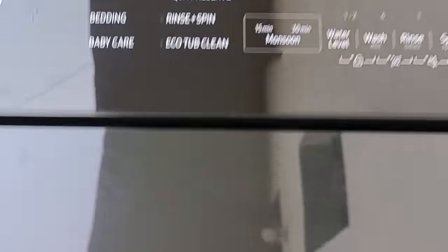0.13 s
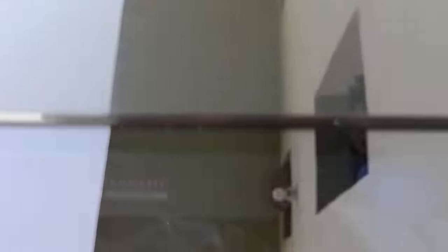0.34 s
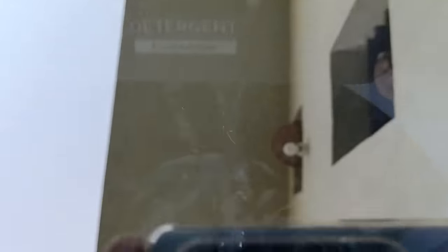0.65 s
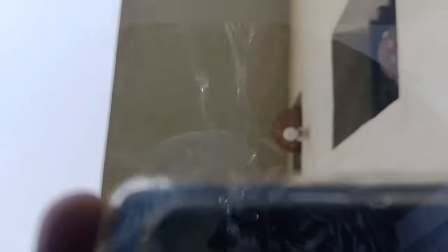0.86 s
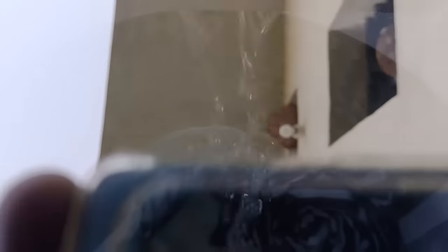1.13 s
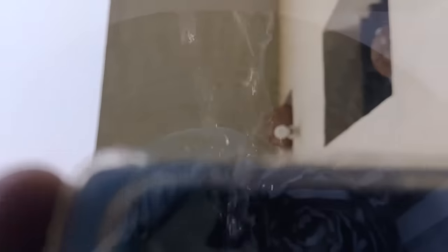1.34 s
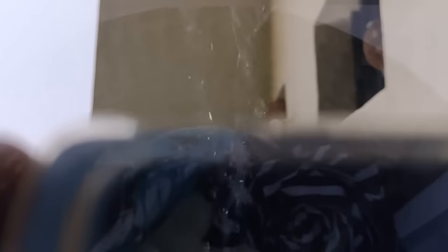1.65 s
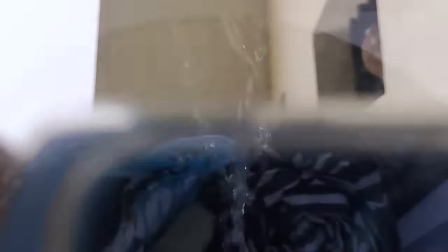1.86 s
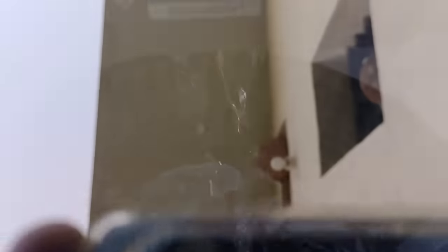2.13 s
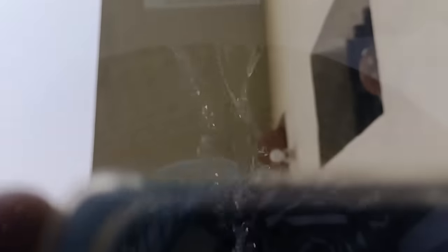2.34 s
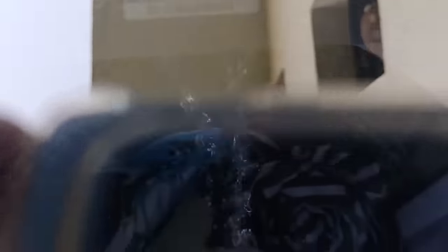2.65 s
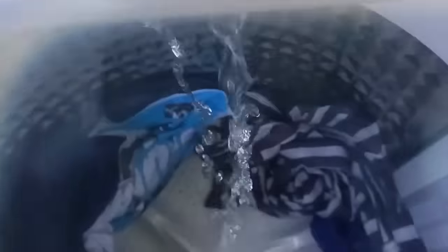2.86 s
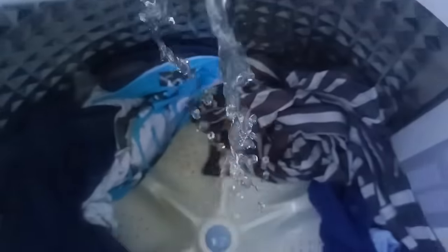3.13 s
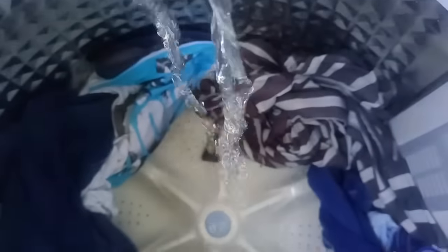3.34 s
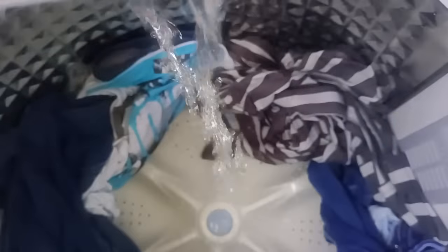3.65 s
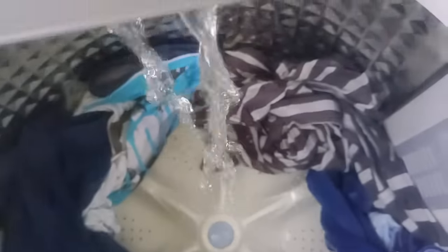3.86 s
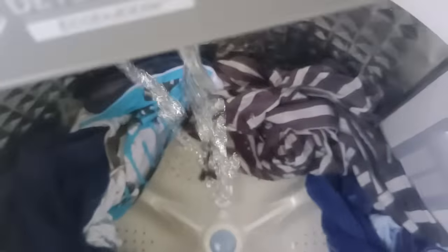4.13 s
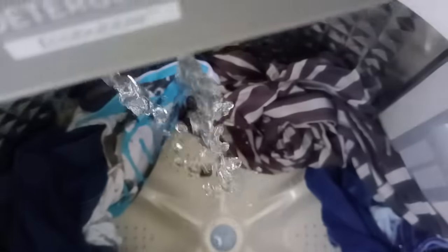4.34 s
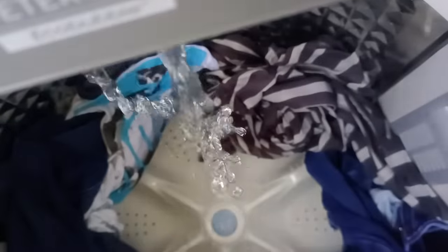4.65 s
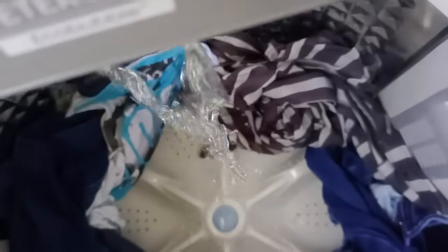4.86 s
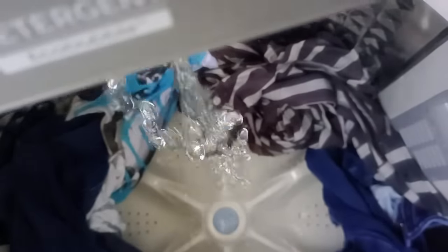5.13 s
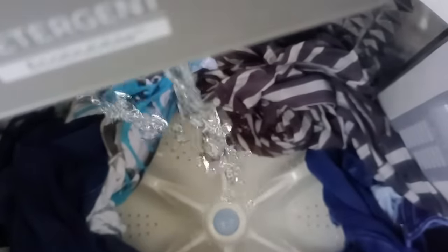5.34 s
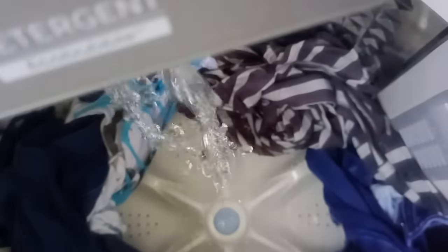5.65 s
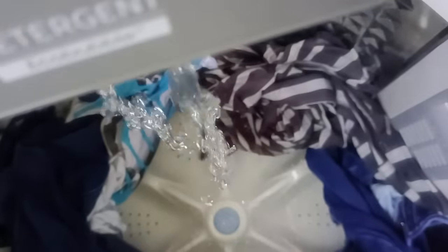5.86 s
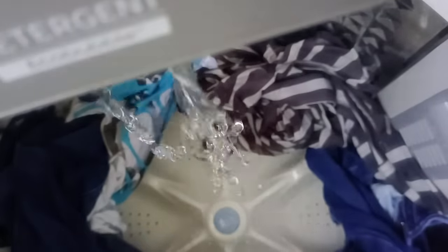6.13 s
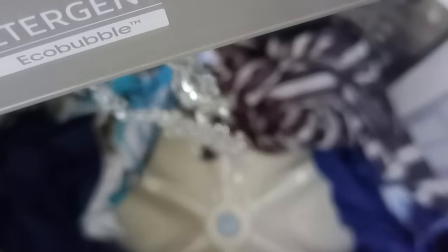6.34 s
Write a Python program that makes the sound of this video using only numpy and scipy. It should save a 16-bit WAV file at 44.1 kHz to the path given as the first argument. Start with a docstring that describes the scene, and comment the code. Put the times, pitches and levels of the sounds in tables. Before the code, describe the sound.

A washer fills with water, heard close through a moving hand-held microphone. From 0 s there is a low, steady electrical hum, fairly soft, with a muffled rumbling pour and faint hiss. By 0.75 s the hum has swollen, and it stays strong until about 4.3 s, dipping briefly near 2.3 and 3.4 s, then falls weaker apart from a short rise near 5 s. Small wet splashes are sparse at first, clearer from 1.3 s, with a bright one at 2.4, a strong one at 3.1 and dense spatter from 3 to 5.2 s; spray hiss grows after 2.7 s. Outside, sparrows give short raspy cheeps and tiny gliding whistles throughout, most noticeable around 2.3, 3.4, 4.2-4.6 and 5.6 s, with a short yard echo. Handling taps click at 1.4, 2.2, 2.6, 3.4 and 3.7 s, hardest at 4.5, again at 5.2-5.3, with a soft bump at 5.9 and a brief scrape near 6.4 s.

```python
"""Washer filling with water

A top-load washer fills: its inlet valve hums at twice the mains rate, built from sines. Filtered noise
makes the running stream, and short noise bursts make the splashes on wet clothes. Sparrows, rough gliding
tones, chirp in the yard outside; the hand-held phone moves over the drum, is tapped now and then by clicks
and thuds, and is briefly scraped near the end."""
import sys
import numpy as np
from scipy import signal
from scipy.fft import rfft, irfft
from scipy.io import wavfile
from scipy.ndimage import uniform_filter1d

SR = 44100
rng = np.random.default_rng(int(sys.argv[2]) if len(sys.argv) > 2 else 0)


def wav_out(sig):
    """Save sig, one row per channel (or a flat mono array), as 16-bit PCM at SR to the path in sys.argv[1]."""
    wavfile.write(sys.argv[1], SR, np.round(np.clip(np.atleast_2d(sig).T, -1, 1) * 32767).astype(np.int16))


N = 286650  # length in samples
LN_60_DB = np.log(1000)  # a fall of 60 dB


def undb(db):
    """Amplitude gain of a level in dB."""
    return 10 ** (np.asarray(db) / 20)


def unit(x):
    """Scale to an rms of 1."""
    return x / np.sqrt(np.mean(x ** 2))


def pan(db):
    """Gains of the two channels for a left-minus-right level."""
    return undb(np.array([db, -db]) / 2)


def ports(apart, opposed):
    """Two channels from three signals: one each, and one that moves the ports in opposite directions."""
    shared = apart[2] * np.array([[1], [-1]])
    return np.sqrt(1 - opposed) * apart[:2] + np.sqrt(opposed) * shared


def curves(table):
    """Each column of a table drawn as straight lines over its first column, time."""
    s, *columns = np.transpose(table)
    return [np.interp(np.arange(N) / SR, s, column) for column in columns]


def on_log(hz, table):
    """A table of values by frequency, read on a logarithmic frequency scale."""
    table_hz, values = np.transpose(table)
    return np.interp(np.log(hz), np.log(table_hz), values)


def band(x, hz, width_hz):
    """Two-pole resonance with gain 1 at the centre."""
    b, a = signal.iirpeak(min(hz, SR / 2.3), hz / width_hz, fs=SR)
    return signal.lfilter(b, a, x)


def walk(rate):
    """Random levels held 1 / rate s and slewed twice; spread 1."""
    hold = int(SR / rate)
    steps = np.repeat(rng.standard_normal(N // hold + 1), hold)
    slewed = uniform_filter1d(uniform_filter1d(steps, hold), hold)
    return unit(slewed[:N])


def add(out, s, sound):
    """Mix a stereo sound in at a time in seconds, cut at the end of the scene."""
    i = max(int(s * SR), 0)
    out[:, i:i + sound.shape[1]] += sound[:, :N - i]


TREMBLE_PER_S = 63.5  # swings a second
WARBLE = 0.011  # share by which the pitch swings with the tremble


def note(hz, depth, rasp_hz, db, pan_db, late):
    """A whistle along a pitch path, roughened by a fast unsteady throat."""
    u = np.arange(len(hz)) / len(hz)
    settle = 999  # samples dropped while the filter starts up
    noise = rng.standard_normal((2, 3, len(u) + settle))
    # a cutoff of half rasp_hz smears the tone over a band rasp_hz wide
    flutter = signal.lfilter(*signal.butter(3, rasp_hz / SR), noise)[..., settle:]
    # slow rasp leaves a steady whistle, wide rasp drowns it
    throat = ports(60 / rasp_hz + unit(flutter[0]) + 1j * unit(flutter[1]), .35)
    # the note trembles slightly in level and pitch
    swing = np.sin(2 * np.pi * (TREMBLE_PER_S * u * len(u) / SR + rng.random()))
    tremble = 1 + depth * swing
    cycles = np.cumsum(hz * (1 + WARBLE * swing)) / SR
    tone = unit(np.real(tremble * throat * np.exp(2j * np.pi * cycles)))
    swell = np.sin(np.pi * u ** late) ** .7
    return undb(db) * pan(pan_db)[:, None] * swell * tone


# raspy cheeps that jump up to a held pitch, then droop; level is rms before the swell, echo and faltering
# start_s, length_s, held_hz, level_db, left_minus_right_db
CHEEP_NOTES = [(0.549, 0.071, 4390, -63.5, -5), (1.303, 0.069, 4255, -51.5, 1), (1.962, 0.07, 4490, -49, 3),
               (2.308, 0.029, 4880, -43, -3.5), (2.488, 0.063, 4460, -48, 3), (3.029, 0.065, 4360, -57, 4),
               (3.388, 0.063, 4710, -46.5, -0.5), (4.185, 0.047, 4786, -41, 0),
               (4.467, 0.091, 4240, -43, 4), (4.563, .075, 4630, -41.5, 0), (4.822, 0.035, 4450, -55.5, -9),
               (5.432, 0.059, 4320, -54, -2), (5.64, 0.064, 4410, -45, 1.5),
               (5.968, 0.077, 3820, -63.5, -1)]
CHEEP_FROM, CHEEP_RISE_S = .7, 0.0099  # starting share of the held pitch, time constant of the jump
CHEEP_ARCH, CHEEP_RASP_HZ = 0.134, 403  # share of the held pitch lost by the end, rasp width
LOW_VOICE, LOW_VOICE_DB = .88, -9.5  # second voice: pitch ratio, level against the first
# gliding whistles; level is rms before the swell, echo and faltering
# start_s, length_s, start_hz, middle_hz, end_hz, rasp_width_hz, level_db, left_minus_right_db
WHISTLE_NOTES = [(0.198, 0.018, 4800, 4700, 4570, 400, -52.5, -2),
                 (0.215, 0.034, 3980, 3960, 3940, 350, -54.5, 1),
                 (0.241, 0.029, 3230, 3180, 3170, 200, -56.5, 4),
                 (0.613, 0.04, 2140, 2070, 1980, 300, -60.5, 4),
                 (1.031, 0.033, 2520, 2780, 3900, 250, -56.5, 1),
                 (1.055, 0.052, 4240, 4170, 4070, 121, -54, -10),
                 (1.059, 0.036, 4580, 5050, 4700, 150, -53, -1),
                 (1.297, 0.034, 5700, 6030, 5800, 300, -58, -6),
                 (1.515, 0.022, 5460, 5520, 6200, 200, -58.5, -4),
                 (1.528, 0.04, 4430, 3240, 2700, 400, -57.5, 3),
                 (1.938, 0.099, 4100, 5390, 5040, 200, -55, -5),
                 (2.106, 0.054, 8220, 6600, 6500, 80, -55, -9.5),
                 (2.25, 0.062, 7960, 6330, 6600, 100, -57.5, -10),
                 (2.279, 0.04, 2700, 2880, 3850, 350, -54.5, 3),
                 (2.35, .035, 6170, 5830, 5240, 600, -57, -3),
                 (2.989, 0.029, 6360, 5620, 5320, 500, -47, -3),
                 (3.38, .026, 2560, 2800, 3700, 250, -54.5, 2),
                 (3.565, 0.083, 3310, 3330, 3740, 900, -59.5, 6),
                 (3.81, 0.035, 6340, 5700, 5050, 300, -47.5, 4),
                 (3.848, 0.025, 4060, 3800, 3350, 300, -53.5, 4.5),
                 (4.171, 0.015, 4460, 5260, 6330, 600, -53, 4),
                 (4.304, 0.033, 5110, 6040, 5570, 250, -44, 2.5),
                 (4.317, 0.035, 5610, 5450, 5270, 500, -48, 3), (4.46, 0.03, 4550, 5450, 5460, 610, -55, 5),
                 (4.791, .03, 6330, 5770, 5240, 200, -47.5, -6.5),
                 (4.83, 0.047, 5500, 5380, 5330, 101, -61.5, -13),
                 (4.974, 0.03, 7000, 6500, 6200, 300, -54, -2),
                 (5.386, 0.044, 3420, 4270, 5300, 250, -49.5, -3),
                 (5.421, 0.034, 5850, 6100, 5550, 500, -55, 0),
                 (5.948, 0.034, 6230, 5920, 5760, 500, -52.5, 0)]
CHEEP_TREMBLE, WHISTLE_TREMBLE = 0.12, 0.08  # level depth 0-1
CHEEP_LATE, WHISTLE_LATE = 0.98, 0.83  # over 1 the note swells late, under 1 early
FALTER_DB = 3.5  # the notes falter irregularly
YARD_T60_S, YARD_DB = 0.36, -6.5  # decay and level of the yard echo
WALL_S, WALL_DB = .135, -9  # late echo of a far wall
BLUR_PER_S = 380  # rate of the random level changes that blur the echo


def yard_echo(dry_birds):
    """Decaying noise stands for the yard walls, with one late burst from a far wall."""
    t = np.arange(int(.5 * SR)) / SR
    decay = np.exp(-LN_60_DB * t / YARD_T60_S)
    wall = undb(WALL_DB) * np.exp(-((t - WALL_S) / .005) ** 2)
    yard = rng.standard_normal((2, len(t))) * (decay + wall)
    yard /= np.sqrt(np.sum(yard ** 2, axis=1, keepdims=True))
    blurred = dry_birds * walk(BLUR_PER_S)
    return undb(YARD_DB) * signal.fftconvolve(blurred, yard, axes=1)[:, :N]


def sparrows():
    """Two-voiced cheeps and gliding whistles, with the echo of the yard walls."""
    birds = np.zeros((2, N))
    for s, length, hz, db, pan_db in CHEEP_NOTES:
        t = np.arange(int(length * SR)) / SR
        jump = (1 - CHEEP_FROM) * np.exp(-t / CHEEP_RISE_S)
        droop = CHEEP_ARCH * (t / length) ** 3
        path = hz * (1 - jump - droop)
        for ratio, voice_db in ((1, db), (LOW_VOICE, db + LOW_VOICE_DB)):
            add(birds, s, note(ratio * path, CHEEP_TREMBLE, CHEEP_RASP_HZ, voice_db, pan_db, CHEEP_LATE))
    for s, length, start_hz, mid_hz, end_hz, rasp_hz, db, pan_db in WHISTLE_NOTES:
        u = np.arange(int(length * SR)) / (length * SR)
        bend = (2 * mid_hz - start_hz - end_hz) * 2 * u * (1 - u)
        path = start_hz + (end_hz - start_hz) * u + bend
        add(birds, s, note(path, WHISTLE_TREMBLE, rasp_hz, db, pan_db, WHISTLE_LATE))
    birds = birds * undb(FALTER_DB * walk(90))
    return birds + yard_echo(birds)


# soft shift of the grip: centre_s, level_db, pitch_hz, half_length_s
GRIP_SHIFT = (5.903, -32, 190, .0035)


def bump():
    """A soft low push of the hand on the phone: a sine under a bell-shaped envelope."""
    s, db, hz, half_s = GRIP_SHIFT
    t = np.arange(N) / SR - s
    return undb(db) * np.sin(2 * np.pi * hz * t) * np.exp(-(t / half_s) ** 2)


# taps on the phone, and a short scrape near 6.4 s; levels are before panning
# start_s, click_db, click_hz, ring_cycles, thud_db, left_minus_right_db
PHONE_KNOCKS = [(1.419, -29, 1380, 0.25, -38, -3.5), (2.173, -31, 1570, 0.62, -56, -6),
                (2.629, -25, 1900, 0.44, -35, 4.5), (3.366, -30, 1650, 5, -62, -10.5),
                (3.666, -32.5, 1780, 0.66, -36, -5), (4.5398, -20.5, 1490, 0.32, -25.5, 13.5),
                (4.549, -30, 1920, .8, -37, -9), (5.159, -34, 1830, 0.55, -41.5, -5),
                (5.329, -25.5, 1380, 0.24, -42, 7.5), (6.403, -36, 1820, 6.3, -44, -5.5),
                (6.413, -37, 1290, 2.9, -42, -4), (6.4613, -20, 2320, 1.5, -62, 9)]
CRACK_DB, CRACK_T60_S = -23.5, 0.011  # treble crack of each knock, level against the click


def taps_and_scrape():
    """A bending wave runs through the shell, treble first: a click opposed at the ports, then a falling thud."""
    out, t = np.zeros((2, N)), np.arange(int(.1 * SR)) / SR
    thud_envelope = (t / .003) * np.exp(1 - t / .003)
    thud = -np.cos(3.3 * np.log(t / .0013 + .2)) * thud_envelope  # log phase: the pitch falls
    thud = np.roll(thud, int(.0012 * SR))
    crack_envelope = np.exp(-LN_60_DB * np.abs(t - .001) / CRACK_T60_S)
    for s, db, hz, ring, thud_db, pan_db in PHONE_KNOCKS:
        turns = hz * (t - .001)
        # short attack before the centre, then the listed ring
        click_envelope = np.exp(-(turns / np.where(turns < 0, .45, ring)) ** 2)
        click = np.sin(2 * np.pi * turns) * click_envelope * np.array([[1], [-.3]])
        noise = rng.standard_normal((2, len(t)))
        rattle = unit(band(band(noise, hz, hz), hz, hz)) * np.exp(-t / 0.0098)
        crack = undb(CRACK_DB) * rng.standard_normal((2, len(t))) * crack_envelope
        shell = undb(db) * (click + 0.073 * rattle + crack)
        add(out, s, pan(pan_db)[:, None] * (shell + undb(thud_db) * thud))
    return out


HUM_HZ = 100  # twice the mains rate
# valve hum as the phone moves, rms before panning: time_s, level_db
HUM_LEVEL = [(0, -37.5), (.75, -30.5), (1.8, -29.5), (2.27, -31.5), (2.36, -29.5), (3.25, -29),
             (3.37, -31.5), (3.47, -32), (3.56, -29), (4.26, -29), (4.48, -37.5), (4.6, -35.5), (4.7, -37),
             (4.95, -33), (5.03, -38), (6.5, -38.5)]
# side of the hum: time_s, left_minus_right_db
HUM_SIDE = [(0, -0.5), (1, -0.5), (3.3, -2), (4.3, -2), (5.1, -0.5), (6.5, -0.2)]
# overtones, rms at the loudest hum before they waver: multiple, level_db, left_lead_cycles
VALVE_OVERTONES = [(2, -55, 0.21), (3, -59, 0.59), (5, -64, 0.63), (7, -78, 0.98)]


def valve():
    """The coil pulls twice a mains cycle; the overtones reach the two ports by different paths."""
    (db,), (pan_db,) = curves(HUM_LEVEL), curves(HUM_SIDE)
    cycles = HUM_HZ * np.arange(N) / SR
    out = undb(db) * pan(pan_db) * np.sin(2 * np.pi * cycles)
    for multiple, over_db, lead in VALVE_OVERTONES:
        turns = multiple * cycles + np.array([[lead], [0]])
        follow_db = 0.23 * (db - db.max())  # overtones follow the hum only in part
        waver_db = 1.25 * walk(6.0)
        out += undb(over_db + follow_db + waver_db) * np.sin(2 * np.pi * turns)
    return np.sqrt(2) * out  # rms to sine peak


# likeness of the two channels in the water noise: pitch_hz, left_right_correlation
PORT_LIKENESS = [(60, 1), (130, 0.02), (290, 0.17), (1400, -0.41), (3100, -0.045), (8000, -0.027)]


def rush(spectrum, swell_db, flicker_db, patter_db):
    """Half-octave bands of stereo noise; they swell and patter together and flicker alone."""
    hz = np.maximum(np.arange(N // 2 + 1) * SR / N, 1)
    like = np.clip(on_log(hz, PORT_LIKENESS), -1, 1)
    noise = rfft(rng.standard_normal((2, N)))
    mid, side = noise * np.sqrt([1 + like, 1 - like]) * undb(on_log(hz, spectrum))
    stereo = np.array([mid + side, mid - side])
    low_hz, high_hz = spectrum[0][0], spectrum[-1][0]
    inside = (hz > low_hz) & (hz < high_hz)
    octave, out = np.log2(hz), 0
    shared = swell_db * walk(2.1) + patter_db * walk(90)
    for centre in np.arange(np.log2(low_hz), np.log2(high_hz) + .5, .5):
        share = inside * np.clip(1 - 2 * np.abs(octave - centre), 0, 1)
        out = out + undb(shared + flicker_db * walk(45)) * irfft(share * stereo, N)
    return out


# the running stream; levels are relative, trimmed when mixed: time_s, rumble_db, hiss_db, top_treble_lift_db
STREAM_LEVELS = [(0, -57.5, -71, 9), (.4, -58.5, -78, 11), (1.2, -56.5, -77, 8), (2.7, -56.5, -67.5, 0),
                 (3.5, -55.5, -68.5, -3.5), (4.3, -56, -65.5, -1.5), (6.5, -58.5, -73, -0.5)]
# spectrum of the rumble in the drum, relative: pitch_hz, density_db (per Hz)
RUMBLE_SPECTRUM = [(12, -90), (20, -34), (43, -20), (67, -23.5), (103, -11), (129, -16.5), (153, -21.5),
                   (209, -19), (561, -31.5), (3000, -53), (3900, -63), (6600, -120)]
# spectrum of the spray, relative: pitch_hz, density_db (per Hz)
HISS_SPECTRUM = [(880, -20), (1500, 3), (1620, -3), (1880, 3.5), (2300, -12), (4330, -1.5), (6000, -4.5),
                 (6960, 0.5), (8240, -7), (10900, -8.5), (12400, -7), (15100, -11.5), (16000, -6)]


def stream():
    """Low rumble of the stream in the drum and the hiss of its spray."""
    rumble_db, hiss_db, top_db = curves(STREAM_LEVELS)
    rumble = rush(RUMBLE_SPECTRUM, swell_db=0.5, flicker_db=2.4, patter_db=1.3)
    hiss = rush(HISS_SPECTRUM, swell_db=1.6, flicker_db=2.8, patter_db=1.8)
    # level each by what its main band holds in the left channel
    rumble /= np.std(band(rumble[0], 409, 597))
    hiss /= np.std(band(hiss[0], 10500, 7000))
    hiss += (undb(top_db) - 1) * band(hiss, 13600, 5000)
    return undb(rumble_db + 3.0) * rumble + undb(hiss_db + 2.5) * hiss * pan(-1.1)[:, None]


def splash(db, hz, spray_db, pan_db, t60=0.044, rise_s=0.0053, spread=0.42):
    """A burst of fine bubbles round one pitch, with high spray on top; it swells as the sheet of water spreads."""
    t = np.arange(int((rise_s + t60) * SR)) / SR
    rise = np.minimum(t / rise_s, 1) ** 2
    fall = np.exp(-LN_60_DB * np.maximum(t - rise_s, 0) / max(t60, .008))
    noise = ports(rng.standard_normal((3, 2 * len(t))), 0.039).reshape(2, 2, -1)
    width_hz = spread * hz
    body = unit(band(band(noise[:, 0], hz, width_hz), hz, width_hz))
    spray = unit(band(band(noise[:, 1], 10200, 4700), 10200, 4700))
    return undb(db - 0.5) * pan(pan_db)[:, None] * rise * fall * (body + undb(spray_db) * spray)


# single splashes; body level is relative, trimmed in splash(); spray is against the body
# crest_s, body_db, centre_hz, spray_db, left_minus_right_db
SPLASH_HITS = [(0.024, -51, 6140, -21, -10), (0.17, -51.5, 7560, 13, -4.5), (0.433, -59.5, 7000, 5, -2),
               (0.636, -55.5, 6540, -3, -4), (1.244, -67.5, 4970, 1, -19), (1.322, -48, 3900, -3, -1),
               (1.652, -54, 4850, -2, -2), (1.6647, -47.5, 4440, -16, 2), (1.703, -52, 4500, 2, 2),
               (1.807, -58, 6500, -8, -2), (1.831, -45.5, 5360, -8, 0), (2.107, -46.5, 3840, -12, 8),
               (2.4149, -39.5, 3600, -20, -2), (2.688, -69, 7000, 8, -6), (2.742, -62.5, 7000, 8, 0),
               (2.862, -47, 4700, 0.5, 1), (3.096, -35.5, 4550, -42, -1), (3.161, -48.5, 5550, -22, -2),
               (3.2993, -45, 4450, -28, -2), (3.416, -45, 6740, -11, -2), (3.4667, -45.5, 6500, -34, -6),
               (3.719, -47.5, 6600, -17, -3), (3.843, -44, 5070, -27, -4), (3.97, -63, 7000, 5, 0),
               (4.097, -43.5, 6500, -32, -1), (4.149, -50.5, 3630, -17, 0), (4.262, -52, 7100, -17, -12),
               (4.303, -47, 6750, -15, -12), (4.36, -46.5, 4270, 0, -1), (4.375, -42.5, 6170, -27, -11),
               (4.398, -56, 6500, 4, -1), (4.626, -51, 6300, -10, -15), (4.68, -48, 5700, -29, -11),
               (4.762, -51.5, 6400, -21, -7), (4.945, -47.5, 4970, -21, -5), (5.1343, -44, 5240, -12, -2.1),
               (5.173, -39.5, 5070, -30, -1.1), (5.2267, -44.5, 4900, -17, -3), (5.757, -54, 7200, -13, -2),
               (5.8666, -45.5, 4120, -11, -5.5), (6.1177, -49.5, 7810, 5.5, 0), (6.47, -44.5, 5600, -22, 3)]
DROPS_CLUMP_DB = 4.5  # swell of the small drops


def splashes(count=1300):
    """The listed splashes, and many small drops between them that come in clumps."""
    out, drops = np.zeros((2, 2, N))
    for s, *row in SPLASH_HITS:
        add(out, s - .005, splash(*row))  # start early so that the crest lands near the listed time
    for when, pitch, size, side in rng.random((count, 4)):
        db = -71 - 1.2 * np.log(1 - .98 * size)  # mostly faint drops, a few louder
        hz = 1800 * 6.14 ** np.sqrt(pitch)
        spray_db = -1 - 20 * side
        pan_db = 8 * (pitch - .5) * (1 - 2 * side) - 2.5
        drop = splash(db, hz, spray_db, pan_db, t60=0.031, rise_s=0.009, spread=0.22)
        add(drops, when * N / SR, drop)
    return out + undb(DROPS_CLUMP_DB * walk(9)) * drops


def scene():
    """The yard, the handled phone and the filling washer together."""
    return sparrows() + bump() + taps_and_scrape() + valve() + stream() + splashes()


# dip of the microphone ports: from_hz, to_hz, share_removed
PORT_NOTCH = (8300, 11400, .5)
TOP_HZ = 15830  # upper limit of the phone


def record(dry):
    """The microphone ports dip below their top resonance; the phone cuts the top."""
    lo_hz, hi_hz, share = PORT_NOTCH
    dip_filter = signal.butter(3, [lo_hz, hi_hz], "bandpass", fs=SR, output="sos")
    dip = signal.sosfiltfilt(dip_filter, dry)
    top_cut = signal.ellip(10, .2, 60, TOP_HZ, fs=SR, output="sos")
    return signal.sosfilt(top_cut, dry - share * dip)


dry = scene()
out = record(dry)
wav_out(out)
```